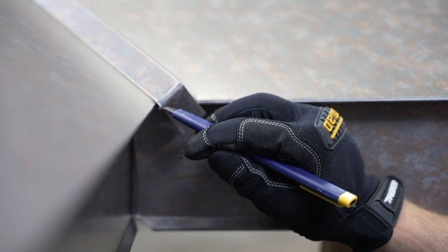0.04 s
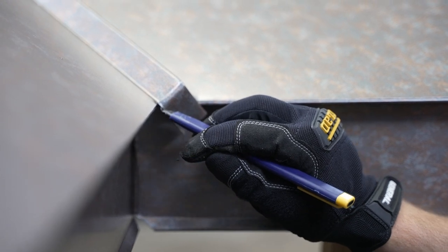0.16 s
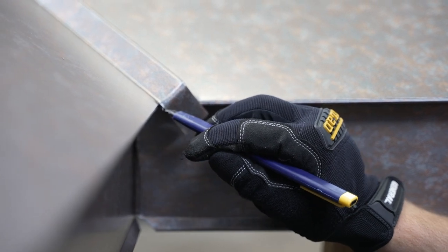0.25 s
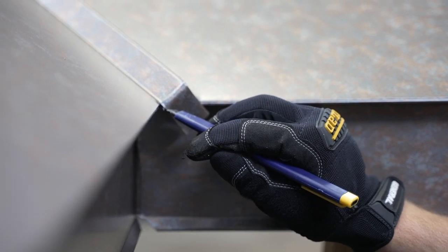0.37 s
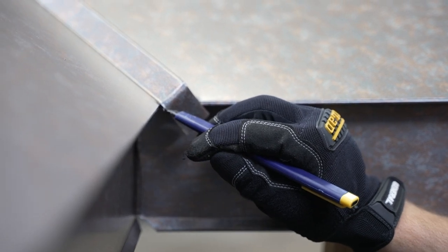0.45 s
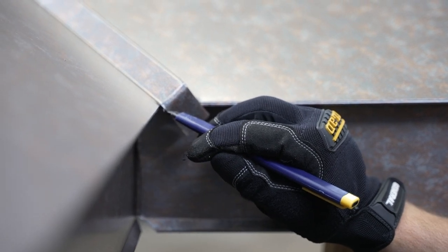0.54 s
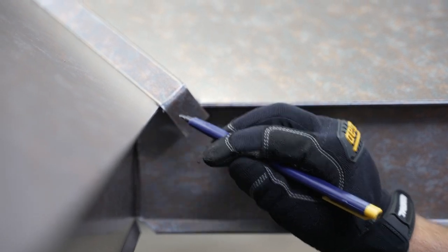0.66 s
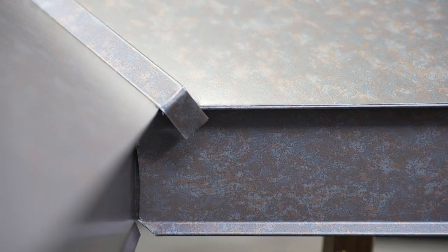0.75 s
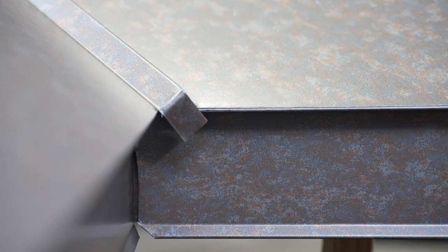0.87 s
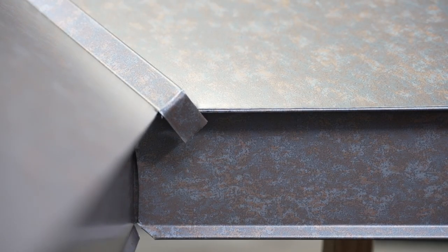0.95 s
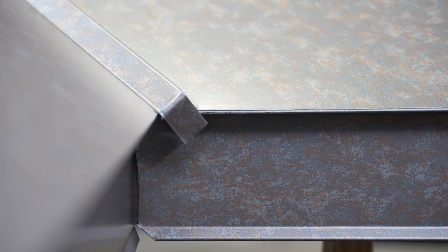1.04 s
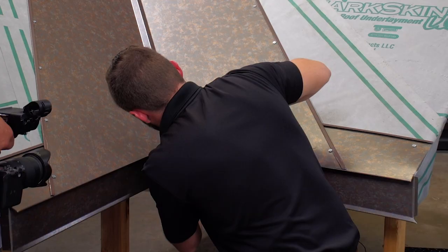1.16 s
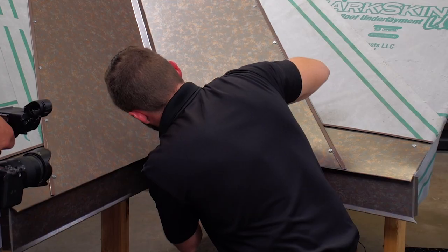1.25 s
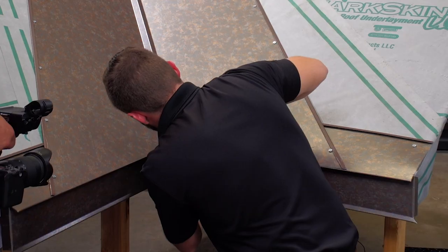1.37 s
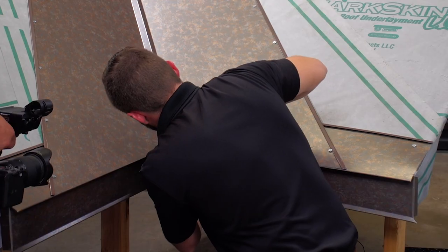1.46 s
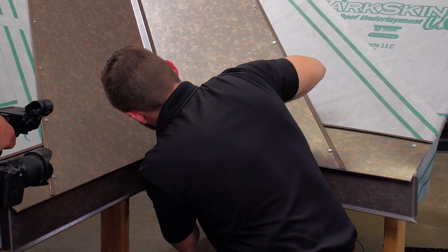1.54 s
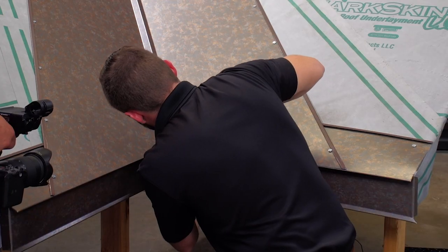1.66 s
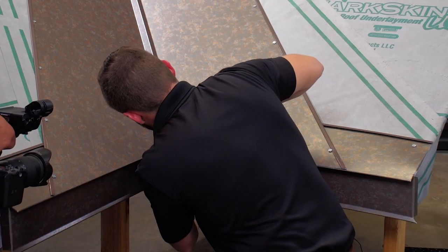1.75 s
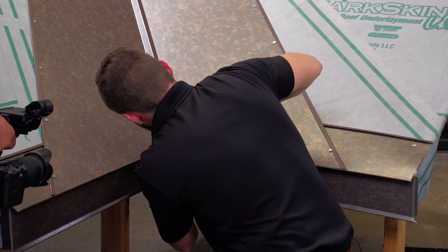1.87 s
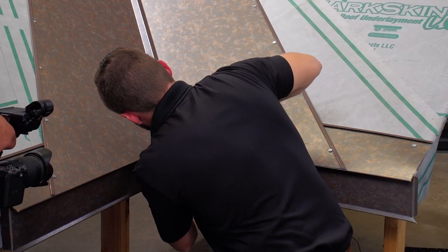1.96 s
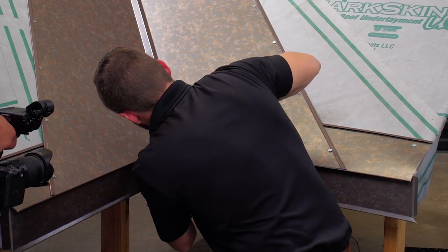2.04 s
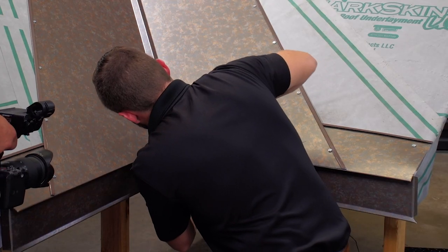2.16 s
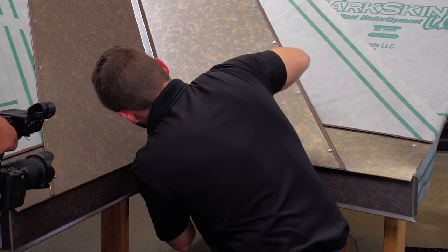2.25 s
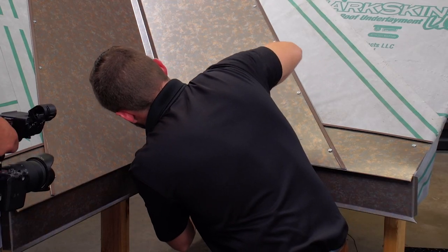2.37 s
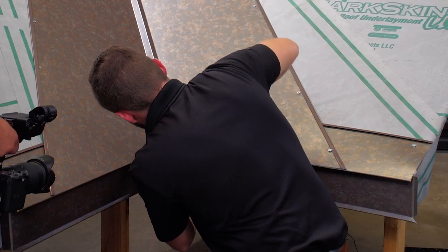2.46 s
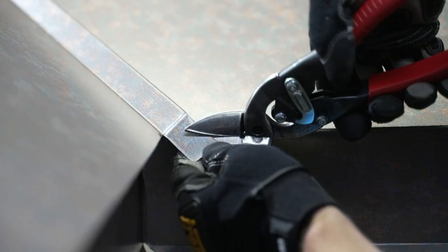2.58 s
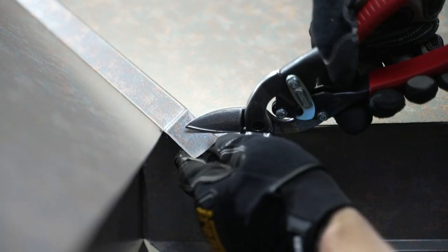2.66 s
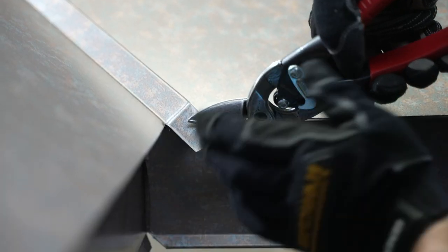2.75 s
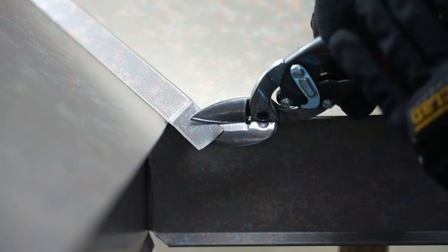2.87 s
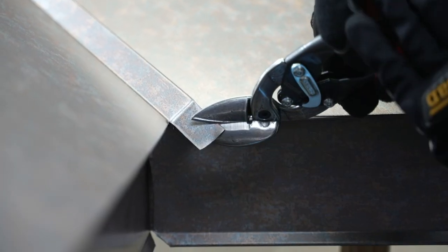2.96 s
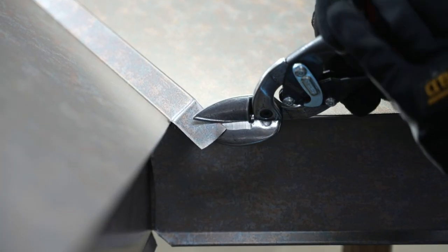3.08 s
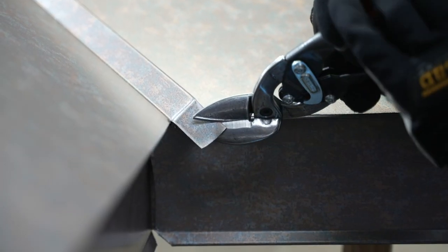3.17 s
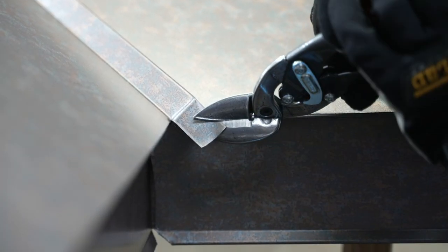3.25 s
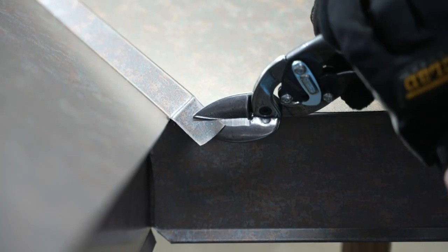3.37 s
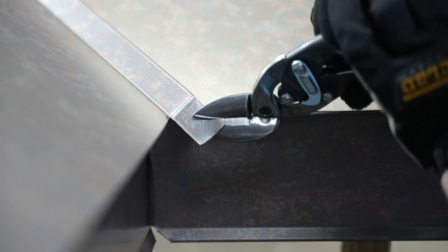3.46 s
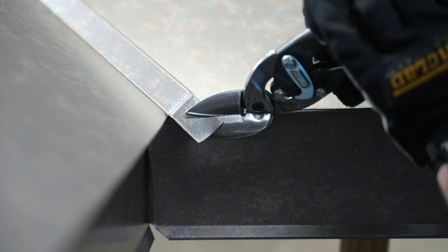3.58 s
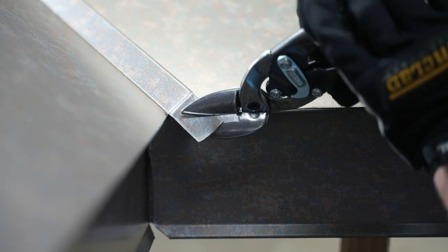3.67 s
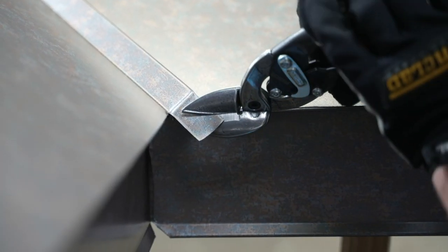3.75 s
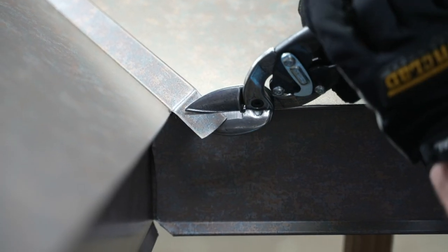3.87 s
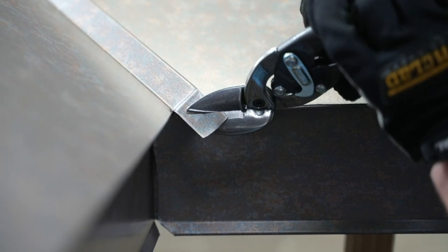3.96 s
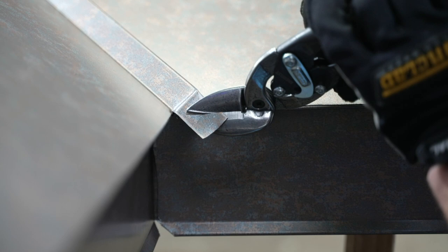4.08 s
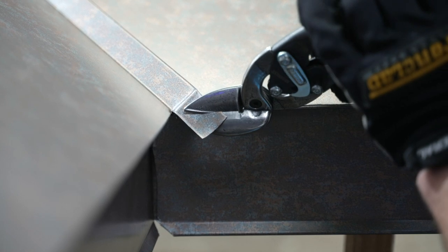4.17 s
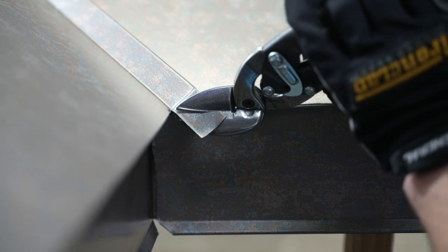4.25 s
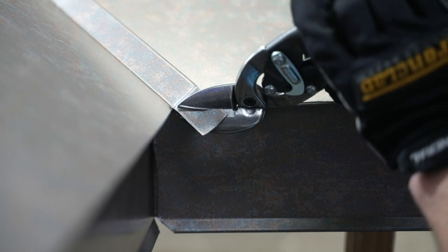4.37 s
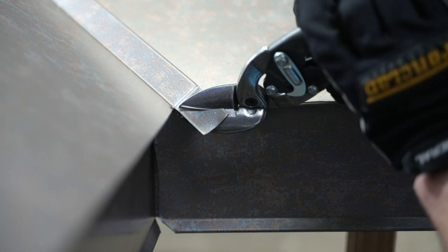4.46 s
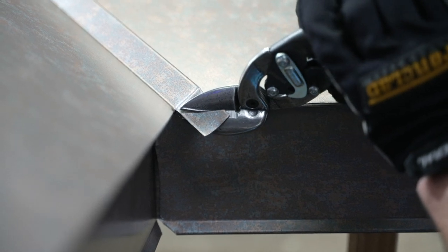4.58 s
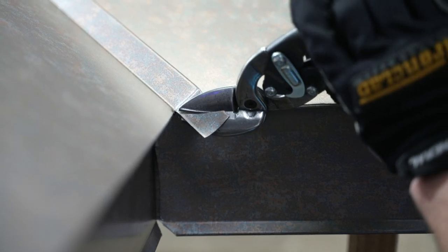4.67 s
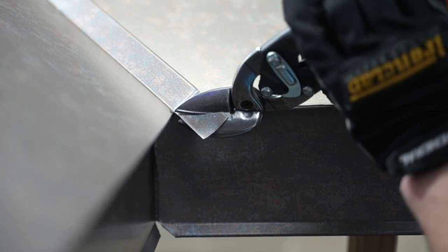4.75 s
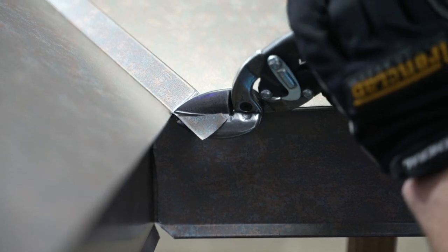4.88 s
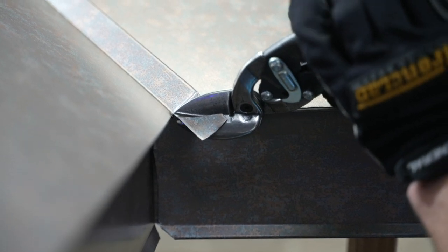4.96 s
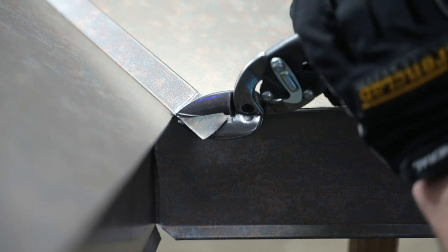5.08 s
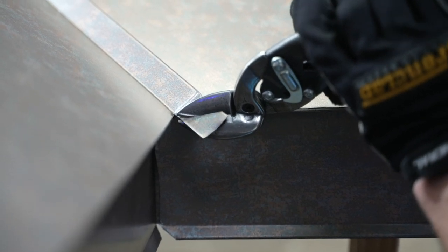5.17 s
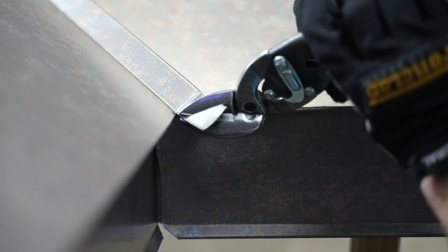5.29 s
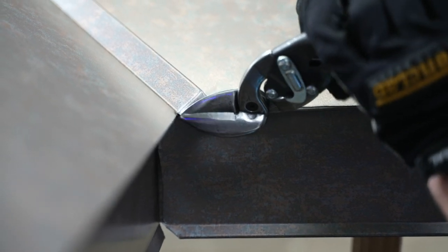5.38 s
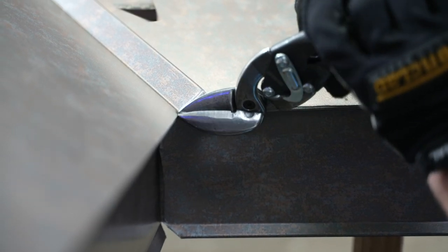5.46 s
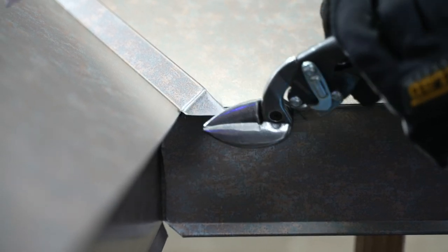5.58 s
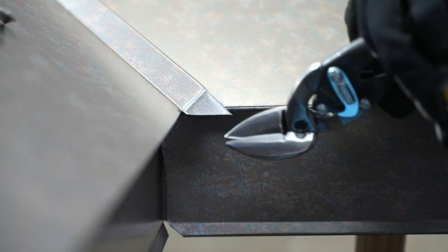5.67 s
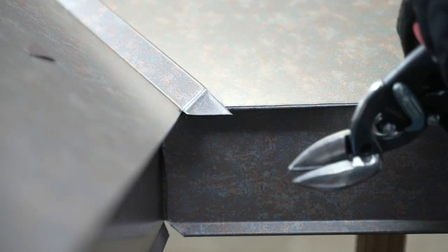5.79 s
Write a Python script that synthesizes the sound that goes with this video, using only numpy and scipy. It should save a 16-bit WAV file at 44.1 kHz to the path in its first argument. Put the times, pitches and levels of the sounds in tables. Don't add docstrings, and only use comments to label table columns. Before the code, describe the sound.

Close view of hand snips cutting folded sheet-metal trim in a quiet, slightly echoing workshop. Faint rustles, handling clicks and one light tap come first, then small bites, grip shifts and creaks. A loud crisp snap breaks through late, followed by the offcut's bright clatter and tiny bounces over low hum.

```python
import sys
import numpy as np
from scipy import signal
from scipy.fft import rfft, irfft
from scipy.io import wavfile
from scipy.ndimage import uniform_filter1d

SR = 44100
rng = np.random.default_rng(int(sys.argv[2]) if len(sys.argv) > 2 else 0)


def pcm_store(signal):
    levels = np.round(np.clip(np.atleast_2d(signal), -1, 1) * 32767)
    wavfile.write(sys.argv[1], SR, levels.astype(np.int16).T)


def decibels_to_gain(level_db):
    exponent = np.asarray(level_db, float) / 20
    return 10 ** exponent


N = 256821

SNAP_HITS = [
    (5.379, -54.5, -19, -15),
    (5.397, -36, -30, -9),
    (5.4012, -31, 4, 0.5),
    (5.4038, -22, -21, -19),
    (5.4085, -43, 15.5, 11),
    (5.413, -44.5, 4.5, 9.5),
    (5.419, -38, 5.5, 1.5),
]
BITE_HITS = [
    (3.2172, -37.5, -4, -41),
    (3.223, -41, -23, -38),
    (3.257, -53, -22, -4),
    (3.319, -62.5, -14, 2),
    (4.127, -57, -6, -2),
    (4.801, -50, -8.5, -28),
]
SHEAR_HITS = [
    (3.888, -49.5, -2.5, -9),
    (3.909, -51.5, -6, -12),
    (3.932, -52, -7, -18),
    (3.958, -55.5, -13, -6),
    (4.444, -55.5, -10, -18),
    (4.453, -47, -3.5, -17),
    (4.477, -49.5, -20, -8.5),
]
LANDING_HITS = [
    (5.6225, -27.5, -3, -40),
    (5.629, -24, -12, -28),
    (5.638, -26, -5, -23),
    (5.652, -26.5, -11.5, -16),
]
BOUNCE_HITS = [
    (5.689, -37.5, -12, -27),
    (5.705, -57, -7, -23),
    (5.725, -41.5, -4, -21),
    (5.738, -45.5, -13, -25),
    (5.76, -51, 3, -17),
]
BLADE_BLOW_HITS = [
    (5.403, -42.5, 1.4, -40),
]
CHIP_BLOW_HITS = [
    (5.69, -65, 0.22, -33),
]
HANDLING_HITS = [(0.623, -59.5, -18, -8), (0.647, -66, -20, -9), (0.813, -44, -16.5, -9),
                 (0.836, -42, -9.5, -8), (0.846, -50.5, -10, -6), (1.846, -79, -5, 4),
                 (1.889, -58.5, -17, -4), (2.437, -62.5, -12, 3), (2.888, -75, 10, -4),
                 (2.919, -78, -12, 9), (3.133, -67.5, -7.5, -6), (3.499, -51.5, -12, -3.5)]
REGRIP_HITS = [
    (3.572, -52.5, -14, 1.5),
    (3.59, -50.5, -7, -16),
    (3.601, -39.5, -17, -8),
    (3.614, -43, -22, 1),
    (3.639, -60.5, -29, 6),
]
NUDGE_HITS = [
    (4.154, -57, -6, -1),
    (4.171, -49, -8, 1),
    (4.182, -50, -9, -3),
    (4.197, -50, -13.5, -5),
]
CREAK_HITS = [(2.655, -62, -3, -8), (2.673, -52, -11.5, -30), (4.645, -59, -11, 4), (4.662, -62, -5, -8),
              (4.69, -63, -10, 6), (4.938, -54, -12.5, -17), (5.065, -57.5, -17, -11),
              (5.18, -64.5, -9, 0.3), (5.228, -60.5, -10.5, -10), (5.278, -60.5, -14, -17)]
RUSTLE_HITS = [
    (.11, -67, -11, 3.7),
    (.595, -76.5, 0.5, 2.6),
    (1.525, -64, -28, 6.5),
    (2.17, -83.5, 3, 21),
    (2.86, -72, 4.5, 9.8),
    (3.06, -75, 1, 9.8),
]
TAP_HITS = [
    (1.2007, -44, 3.5, 1.9),
]

TRIM_MODES = [(495, -48, 0.36), (637.7, -3, 0.24), (743.5, -2, 0.16), (931, -4.5, 0.27), (1158, -6, 0.16),
              (1455, -2.5, 0.037), (2614, 12, 0.082), (2763, 12, 0.065), (4370, -14, 0.039)]
JAW_MODES = [(118, 14, 0.041), (681, 2.5, 0.21), (764, 12.5, 0.14), (1026, -4.5, 0.48), (1560, 12, 0.014),
             (2220, 8, 0.022), (2720, 13.5, 0.015), (2890, 8, 0.065)]
OFFCUT_MODES = [(682, -2, 0.18), (768, -2.5, 0.1), (935, -3, 0.52), (1064, 3, 0.08), (1096, -2.5, 0.14),
                (1650, -12, 0.18), (2013, 4, 0.15), (2348, 5, 0.22), (2920, -4.5, 0.27), (5985, 6, 0.042),
                (6700, 3, 0.051), (4680, -2.5, 0.11), (7747, -27, 0.29)]
CHIP_MODES = [(925, 15, 0.15), (1184, -12, 0.16), (2340, 5, 0.066), (6540, 0, 0.087), (9100, 4, 0.03),
              (11770, -24, .2)]
FRAME_MODES = [(138, 8, 0.24), (288.3, 6.5, 0.23), (477, 0.5, 0.24), (642, 11, 0.032), (1050, -5.5, 0.21)]
PIVOT_WIDE_MODE = (3480, 1.6, 0.052)
PIVOT_HALF_SHUT_MODE = (2700, 6, 0.11)
PEN_MODES = [(113, -4, 0.025), (1940, 9, 0.12), (2918, 5.5, 0.33), (3580, 1.5, 0.025), (4090, -7.5, 0.29),
             (4870, -2.5, 0.033), (6300, -4.5, 0.035), (7800, -5.5, 0.073), (8070, -3.5, 0.023),
             (11540, -33, .1), (15100, -23, .03)]
BLADE_LINES = [(1545, 0, .45), (3520, 0, .5), (7763, 0, .7), (11770, -4, .18)]
CHIP_LINES = [(1000, 0, .1), (2500, 0, .1), (7750, 0, .45), (11770, -6, .3), (12920, -1, .45),
              (14520, -2, .45), (15000, 4, .03)]

# body to upper body to edge, then the thump (frequency [Hz])
REGION_EDGES_HZ = [450, 2000, 4000, 16000, 90, 450]
# (peak time [s], frequency [Hz], level [dB], swell [ms], stop [ms])
TEAR_CHATTER = [
    (5.4068, 1484, -8.5, 2.4, 0.17),
    (5.4048, 2520, -13.5, 0.76, 0.63),
]
# (start [s], crest [s], end [s], crest frequency [Hz], sag [Hz])
HINGE_WHISTLES = [
    (0.708, 0.736, 0.788, 11790, 1300),
    (3.522, 3.553, 3.635, 12690, 1900),
    (3.642, 3.663, 3.73, 11830, 1900),
    (5.128, 5.162, 5.205, 11700, 1500),
]
# (first burst [s], bursts [count])
COIL_RUNS = [
    (1.18, 11),
    (2.546, 2),
    (2.956, 6),
    (4.976, 4),
]
# (frequency [Hz], time to fall 60 dB [s])
ECHO_TIMES = [(60, 0.47), (250, 0.68), (1000, 0.52), (4000, 0.59), (10000, 0.3), (16000, 0.24)]
# (frequency [Hz], level per Hz [dB])
HUM_COLOUR = [(20, -12.5), (105, 0.5), (190, -7), (430, -12.5), (760, -13.5), (2810, -25.5), (15200, -29),
              (16500, -27)]
# (time [s], swell [dB], half length [s])
WORKER_SHIFTS = [
    (0.16, -1.3, 1),
    (0.984, 1.6, 0.6),
    (2.747, 0.8, 0.59),
    (3.32, -2, 0.061),
    (3.5, 1.4, 0.072),
    (4.9, 0.6, .3),
]

TAP_END_S = 1.2204
GRIP_BUILD_UP = 0.8


def fade(n, t60):
    return np.exp(-np.log(1000) * np.arange(n) / SR / max(t60, .002))


def band(x, lo_hz, hi_hz):
    return signal.sosfilt(signal.butter(2, [lo_hz, hi_hz], "bandpass", fs=SR, output="sos"), x)


def stick_slip(t, slip_ms, grit_db, soft):
    u = t / (max(slip_ms, .1) / 1000)
    signs = rng.choice([-1, 1], len(u))
    sizes = decibels_to_gain(grit_db * rng.exponential(size=len(u)))
    slips = signs * sizes * np.exp(-u) * np.tanh(u / soft)
    return slips / np.sqrt(np.sum(slips ** 2))


def contacts(events, modes, dense_db, dense_t60, split_hz, grit_db, dull_hz, soft, slip_ms, edge_db, keen):
    out, n = np.zeros(N + SR), SR // 4
    t = np.arange(n) / SR
    edges = REGION_EDGES_HZ
    spans = [edges[0:2], edges[1:3], edges[4:6], edges[2:4]]
    for s, strength_db, bright_db, heft_db in events:
        region_db = strength_db + np.array([0, bright_db, heft_db, edge_db + keen * bright_db])
        slips = stick_slip(t[:SR // 12], slip_ms, grit_db, soft)
        touch = decibels_to_gain(2.5 * rng.standard_normal(len(modes)))
        detune = rng.standard_normal((len(modes), 3, 1))
        wash = band(rng.standard_normal(n), 40, dull_hz)
        for (lo, hi), db, wash_db, t60 in zip(spans, region_db, dense_db, dense_t60):
            swell = np.sqrt(np.abs(signal.fftconvolve(fade(n, t60) ** 2, slips ** 2)[:n]))
            dense = band(band(wash * swell, lo, hi), lo, hi)
            dense = decibels_to_gain(wash_db) * dense * np.sqrt(SR / (hi - lo))
            ring = np.zeros(n)
            for (hz, mode_db, mode_t60), g, d in zip(modes, touch, detune):
                if lo <= hz < hi:
                    turn = 2 * np.pi * (hz + split_hz * min(3000 / hz, 1) ** 2 * d) * t
                    share = np.abs(np.exp(1j * turn[:, :len(slips)]) @ slips)[:, None] + .15
                    partials = (np.sin(turn) / share).mean(axis=0)
                    ring = ring + g * decibels_to_gain(mode_db) * partials * fade(n, mode_t60)
            ring = dense + band(signal.fftconvolve(ring, slips)[:n], .6 * lo, hi)
            loudest = np.sqrt(uniform_filter1d(ring ** 2, size=176).max())
            i = int(s * SR)
            out[i:i + n] += decibels_to_gain(db) * ring / loudest
    return out[:N]


def snap():
    return contacts(SNAP_HITS, JAW_MODES, [-3.5, -6, 3.0, 6.0], [0.21, 0.059, 0.19, 0.066],
                    split_hz=26, grit_db=3.5, dull_hz=8800, soft=0.19, slip_ms=1.6, edge_db=-1.5, keen=1.0)


def tear():
    ms, out = np.arange(N) / SR * 1000, 0
    for s, hz, db, swell_ms, stop_ms in TEAR_CHATTER:
        late = ms - 1000 * s
        swell = np.exp(-np.abs(late) / np.where(late < 0, swell_ms, stop_ms))
        out = out + decibels_to_gain(db) * swell * np.sin(2 * np.pi * hz * late / 1000)
    return out * (ms > 1000 * SNAP_HITS[2][0])


def bites_and_shears():
    bites = contacts(BITE_HITS, TRIM_MODES, [-11.0, -33, -6, -14], [0.078, 0.12, 0.22, 0.05],
                     split_hz=44.0, grit_db=3.5, dull_hz=8700, soft=0.046, slip_ms=2.06,
                     edge_db=-34.5, keen=-0.63)
    shears = contacts(SHEAR_HITS, TRIM_MODES, [-4, -17, -6, -13], [0.067, 0.096, 0.28, 0.034],
                      split_hz=57.4, grit_db=3.5, dull_hz=8600, soft=0.36, slip_ms=5.8,
                      edge_db=-20, keen=-0.088)
    return bites + shears


def offcut_fall():
    landing = contacts(LANDING_HITS, OFFCUT_MODES, [-4.0, -2.0, -8, 3.5], [0.13, 0.11, 0.096, 0.054],
                       split_hz=26.1, grit_db=6.0, dull_hz=9000, soft=0.034, slip_ms=2.0,
                       edge_db=12.0, keen=2.98)
    bounces = contacts(BOUNCE_HITS, CHIP_MODES, [8, -7, -8, 9], [0.23, 0.12, 0.037, 0.055],
                       split_hz=35, grit_db=-1.0, dull_hz=12500, soft=0.095, slip_ms=0.8,
                       edge_db=3.7, keen=0.078)
    return landing + bounces


def steel_rings():
    out = 0
    for blow, lines, edge_db in ((BLADE_BLOW_HITS, BLADE_LINES, -3), (CHIP_BLOW_HITS, CHIP_LINES, 20)):
        out = out + contacts(blow, lines, [-40] * 4, [.02] * 4, split_hz=28.6, grit_db=3, dull_hz=9000,
                             soft=.3, slip_ms=1.2, edge_db=edge_db, keen=0)
    return out


def handling():
    out = contacts(HANDLING_HITS, TRIM_MODES[:3], [1.5, 0, -6, 0], [0.05, 0.13, 0.1, 0.021],
                   split_hz=54, grit_db=10.5, dull_hz=14400, soft=0.047, slip_ms=3.1,
                   edge_db=4.5, keen=1.21)
    out += contacts(RUSTLE_HITS, [], [0, 0, 0, 0], [0.027, 0.015, 0.072, 0.02],
                    split_hz=0, grit_db=1.5, dull_hz=14700, soft=2.2, slip_ms=15, edge_db=5, keen=1.5)
    out += contacts(CREAK_HITS, TRIM_MODES, [-26, 2, -6, -10], [0.039, .04, 0.12, 0.028],
                    split_hz=57.0, grit_db=4.0, dull_hz=10000, soft=GRIP_BUILD_UP, slip_ms=13.0,
                    edge_db=-5.5, keen=1.0)
    return out


def regrips():
    out = 0
    for grips, pivot in ((REGRIP_HITS, PIVOT_WIDE_MODE), (NUDGE_HITS, PIVOT_HALF_SHUT_MODE)):
        out = out + contacts(grips, FRAME_MODES + [pivot], [-7.5, -7.5, -26, 0],
                             [0.072, 0.045, 0.086, 0.031], split_hz=22.6, grit_db=3.5, dull_hz=13500,
                             soft=GRIP_BUILD_UP, slip_ms=8.5, edge_db=-8, keen=0.91)
    return out


def pen_tap():
    tap = contacts(TAP_HITS, PEN_MODES, [0.5, -1, -2, -11.5], [0.1, 0.048, 0.009, 0.07],
                   split_hz=5, grit_db=1.5, dull_hz=14100, soft=0.75, slip_ms=0.4, edge_db=14, keen=0)
    return tap * (np.arange(N) < TAP_END_S * SR)


def squeaks():
    arch_ms, fade_ms = 45, 10
    ms, out = np.arange(N) / SR * 1000, 0
    for start, crest, end, hz, sag_hz in HINGE_WHISTLES:
        pitch = hz - sag_hz * (1 - np.exp(-((ms - 1000 * crest) / arch_ms) ** 2))
        live = np.clip(np.minimum(ms - 1000 * start, 1000 * end - ms) / fade_ms, 0, 1)
        out = out + live * np.sin(2 * np.pi * np.cumsum(pitch) / SR)
    return decibels_to_gain(-75.5) * out


def room(x, first_s=0.004):
    hz, t60 = np.transpose(ECHO_TIMES)
    rise = np.exp(-1 / SR / first_s)
    out = 0
    for f in 63 * 2 ** (np.arange(25) / 3):
        lo, hi = f / 2 ** (1 / 6), f * 2 ** (1 / 6)
        keep = np.exp(-2 * np.log(1000) / SR / np.interp(np.log(f), np.log(hz), t60))
        arriving = signal.lfilter([1 - rise], [1, -rise], band(x, lo, hi) ** 2)
        energy = signal.lfilter([1 - keep], [1, -keep], arriving)
        out = out + np.sqrt(energy * SR / 2 / (hi - lo)) * band(rng.standard_normal(N), lo, hi)
    return out


def walk(rate):
    k = int(SR / rate)
    held = np.repeat(rng.standard_normal(N // k + 1), k)
    return 0.66 * uniform_filter1d(uniform_filter1d(held, k), k)[:N]


def whine():
    every_s, on_s, held_s = .106, .068, .335
    t = np.arange(N) / SR
    on = 1. * (t < held_s)
    for s, count in COIL_RUNS:
        in_run = (t > max(s, TAP_END_S)) & (t < s + count * every_s)
        on += in_run & ((t - s) % every_s < on_s)
    bursts = decibels_to_gain(-79.0) * uniform_filter1d(on, size=90) * np.sin(2 * np.pi * 10999 * t)
    steady = decibels_to_gain(-92 + 2.5 * walk(8)) * np.sin(2 * np.pi * 12403 * t)
    return bursts + steady


def shop_tone():
    out, t = 0, np.arange(N) / SR
    hz, db = np.transpose(HUM_COLOUR)
    stir_db = 2.5
    for s, swell_db, half in WORKER_SHIFTS:
        stir_db = stir_db + swell_db * np.exp(-((t - s) / half) ** 2)
    white = rfft(rng.standard_normal(N))
    f = np.maximum(np.arange(len(white)) * SR / N, 10)
    coloured = white * decibels_to_gain(np.interp(np.log(f), np.log(hz), db))
    for centre in 22 * 2 ** np.arange(0, 10, .5):
        share = np.cos(np.pi * np.clip(np.log2(f / centre), -.5, .5)) ** 2
        lively = np.clip(np.log2(6000 / centre) / 3.2, .15, 1)
        out = out + irfft(coloured * share, N) * decibels_to_gain(lively * (2.07 * stir_db + 0.93 * walk(5.3)))
    return decibels_to_gain(-61.5) * out / np.std(out)


def scene():
    hands = handling()
    bites = bites_and_shears()
    hands = hands + regrips()
    cut, chatter = snap(), tear()
    fall = offcut_fall()
    tap = pen_tap()
    fall = fall + steel_rings()
    into_room = decibels_to_gain(-9.5) * hands + decibels_to_gain(-14) * bites + decibels_to_gain(-7.5) * cut
    into_room = into_room + decibels_to_gain(-17.0) * chatter + decibels_to_gain(-8.5) * fall
    metal = hands + bites + cut + chatter + fall + room(into_room)
    return (metal + tap + whine() + squeaks() + shop_tone())[None]


def band_limit(x):
    return signal.sosfilt(signal.butter(12, 16650, fs=SR, output="sos"), x)


def record(dry):
    soft = signal.sosfilt(signal.butter(8, 16000, fs=SR, output="sos"), dry)
    return band_limit(soft)


dry = scene()
out = record(dry)
pcm_store(out)
```